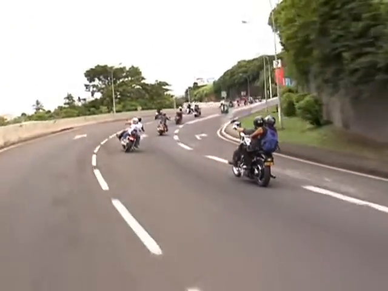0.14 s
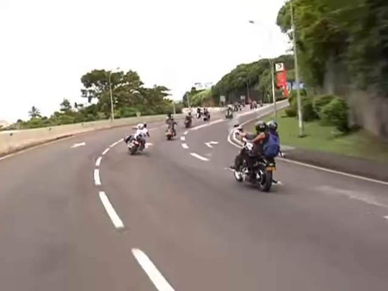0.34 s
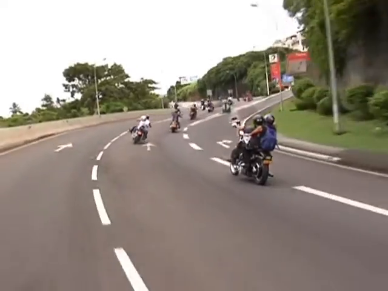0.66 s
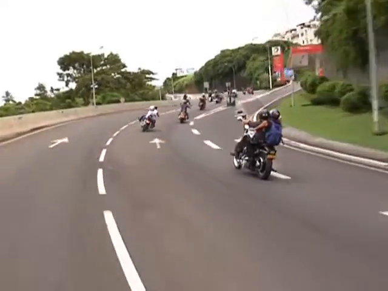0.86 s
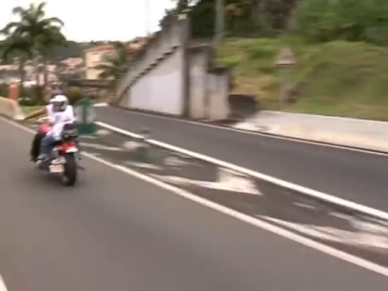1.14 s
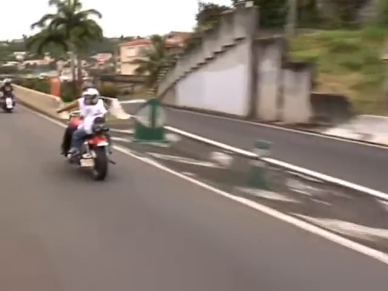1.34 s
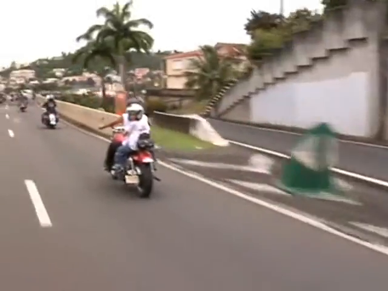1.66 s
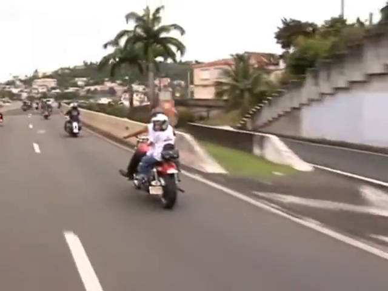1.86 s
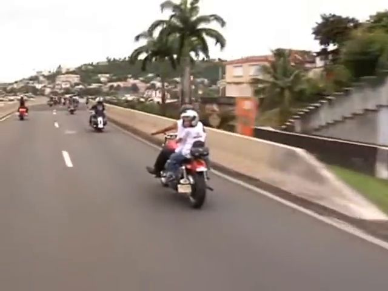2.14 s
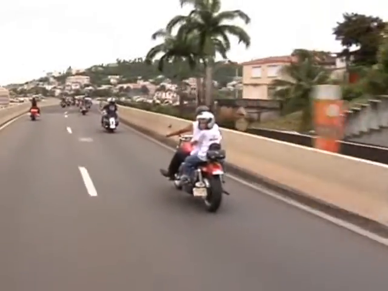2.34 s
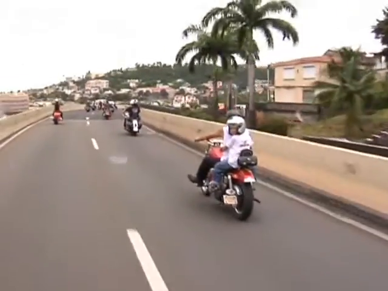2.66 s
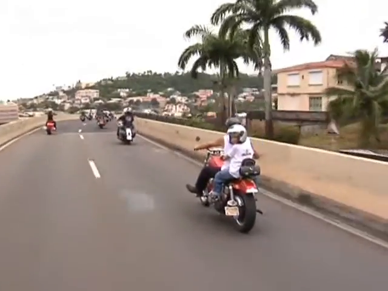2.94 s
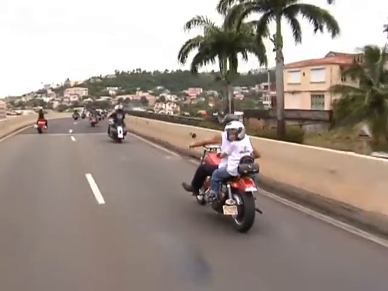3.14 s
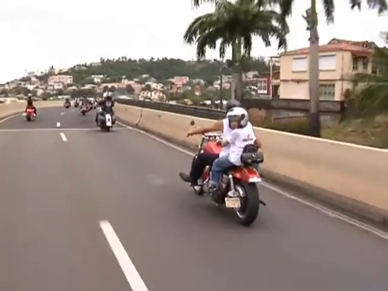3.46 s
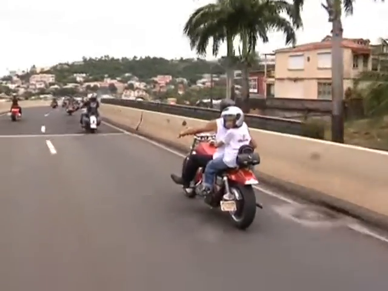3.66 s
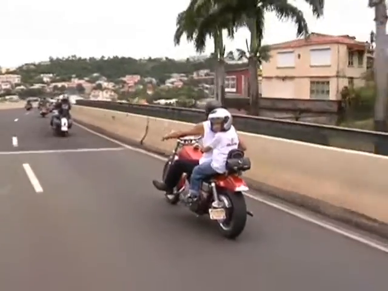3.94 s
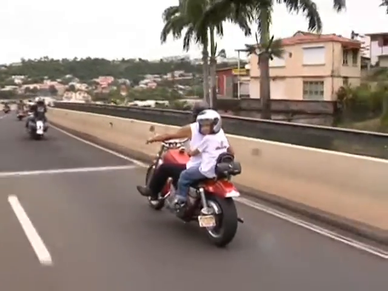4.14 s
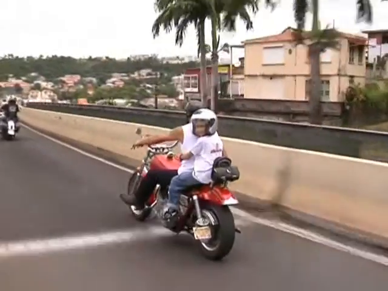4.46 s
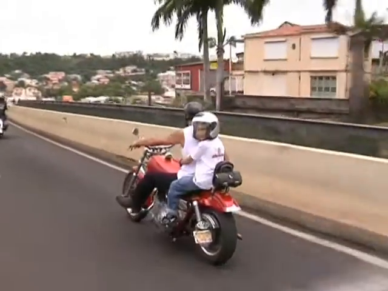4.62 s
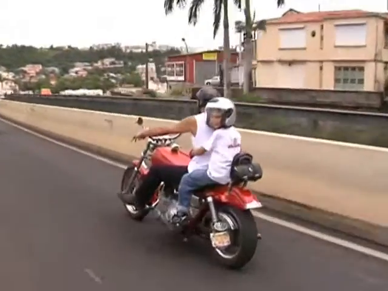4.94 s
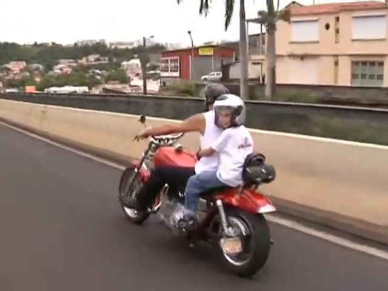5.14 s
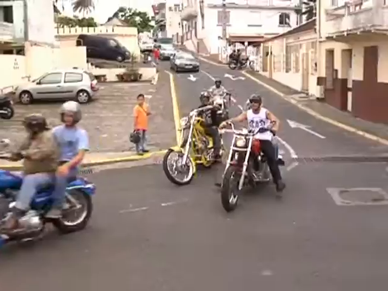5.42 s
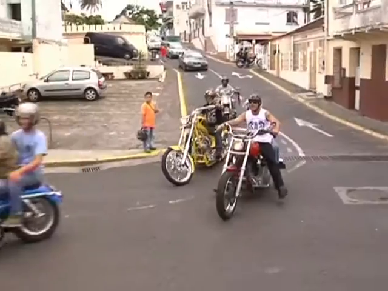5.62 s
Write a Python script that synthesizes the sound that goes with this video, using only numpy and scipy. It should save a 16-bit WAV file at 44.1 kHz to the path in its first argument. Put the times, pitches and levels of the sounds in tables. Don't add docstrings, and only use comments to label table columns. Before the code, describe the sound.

Two motorcycles accelerate away with loud uneven barking exhausts, then a quieter windy ride among droning bikes, ending on a soft slow idle.

```python
import sys
import numpy as np
from scipy import signal
from scipy.fft import rfft, irfft, next_fast_len
from scipy.io import wavfile
from scipy.ndimage import uniform_filter1d, map_coordinates

SR = 44100
rng = np.random.default_rng(int(sys.argv[2]) if len(sys.argv) > 2 else 0)


def transcribe(signal):
    frames = np.atleast_2d(signal).T
    limited = np.clip(frames, -1, 1)
    pcm = np.round(limited * 32767).astype(np.int16)
    wavfile.write(sys.argv[1], SR, pcm)


def to_linear_factor(level_db):
    exponent = np.asarray(level_db, float) / 20
    return 10 ** exponent


N = 255337

SCENE_CHANGES = 1.1625, 5.48
# (time [s], peak [dB])
CLICKS = [(5.4335, -48), (5.48, -41)]

# (time [s], wind [dB], nearness of the pack [dB])
WALL_AIR = [(0, -32.5, -30.5), (.3, -30.5, -30), (.6, -35, -35.5), (.9, -31.5, -34), (1.17, -28.5, -31)]
RIDE_AIR = [(1.17, -37, -39.5), (1.25, -35, -39.5), (1.53, -40, -44), (1.94, -40, -42.5), (2.4, -42, -47),
            (2.8, -41.5, -45.5), (3.3, -40, -46), (3.8, -43, -47.5), (4.1, -41, -44), (4.42, -43, -44.5),
            (4.6, -39.5, -41.5), (4.8, -42, -43.5), (5.42, -39.5, -42.5), (5.48, -39, -45.5)]
STREET_AIR = [(5.48, -42, -50), (5.57, -46, -46.5), (5.8, -40.5, -50)]
# (roar over drone [dB], hiss [dB], share of nearness in the hiss [1])
WALL_MIX = (-7.5, -40.5, 0.41)
RIDE_MIX = (-10.5, -61, 0.37)
STREET_MIX = (-8, -59, .1)

# (frequency [Hz], density [dB per Hz])
WALL_RUMBLE = [(30, -5), (60, 0), (120, 5), (190, -8), (300, -13), (500, -10), (800, -17)]
RIDE_RUMBLE = [(8.8, -56), (15, -7), (43, -2.5), (86, 1.5), (144, -1), (172, -8), (200, -10), (260, -24.5),
               (440, -120)]
STREET_RUMBLE = [(18, -61), (101, 8), (140, -5), (290, -10), (337, 4), (373, -22), (600, -24), (900, -75)]
# (frequency [Hz], density [dB per Hz])
DRONE = [(100, -45), (170, 0.5), (230, 0.5), (300, -5.5), (380, -5.5), (480, -19.5), (700, -20)]
ROAR = [(250, -51), (430, -2), (600, 1), (800, 1), (1130, -3), (1250, -8), (2000, -22.5), (3500, -32)]
TYRE_HISS = [(800, 1.5), (1500, 4.5), (2500, 1.5), (4000, -8), (6000, -12.5), (9000, -21), (12500, -19),
             (15800, -23)]
# (time [s], strength [dB], above -29.5 lifts the level, below lowers it)
THUMPS = [(2.031, -15), (2.19, -23), (3.001, -41), (3.14, -34), (3.291, -25), (3.687, 8), (3.767, -30),
          (4.505, 6)]

# (time [s], peak [dB], knock [dB], length [s])
RATTLES = [(1.1973, -51, 3, 0.0089), (1.283, -54, -11, 0.007), (1.361, -47.5, -27, 0.0082),
           (1.453, -52, -77, 0.007), (1.477, -50, -12, 0.007), (1.597, -50.5, 8, 0.0076),
           (1.93, -59, -15, 0.007), (1.9965, -56, 4, 0.007), (2.0214, -58, 6, 0.007),
           (2.135, -59, 15, 0.007), (2.2674, -58, -3, 0.0058), (2.406, -51.5, 4, 0.0076),
           (2.611, -57, -1, 0.007), (2.716, -54, -21, 0.007), (2.8066, -55, 15, 0.0076),
           (2.953, -52, 2, 0.007), (3.068, -55, 2, 0.007), (3.098, -53, -3, 0.007),
           (3.231, -53, -2, 0.0063), (3.2701, -57, -5, 0.005), (3.4397, -48.5, 2, 0.0076),
           (3.535, -60, -3, 0.007), (3.727, -52, 1, 0.007), (3.866, -54, 4, 0.0076),
           (4.0089, -51, 2, 0.0075), (4.5148, -53, 0, 0.0052), (4.953, -53, 5, 0.007),
           (4.9832, -58, -7, 0.007), (5.135, -56, -6, 0.007), (5.176, -52, 1, 0.007)]
# (frequency [Hz], density [dB per Hz])
CHATTER = [(3000, -18), (5000, 3), (7000, -5.5), (10000, -3), (13000, -2), (14500, -9), (15800, -20)]
KNOCK = [(700, -22), (1500, 3), (3000, 7), (5000, -11), (7000, -18)]

NEAR_CRANK = .02177, 38.43, -.1638, .00335, -1, 32
FAR_CRANK = .45085, 37.22, -.1134, 0, -4, 20
IDLE_CRANK = 5.5006, 68.63, 2.47, 0, 0, 4
LATE_CRANK = 4.5, 50.8, 0, 0, 0, 19
SECOND_FIRING = .393, .398, .455, .49

# (time [s], blow [dB], wall echo [ms], throttle [dB])
NEAR_PLAY = [
    (0, -5, 6.1, .1),
    (.4, -4.5, 6.4, 1.5),
    (.6, -7.5, 6.86, -6.5),
    (.8, -7, 7.14, -5.5),
    (1.2, -5.5, 6.82, -6.5),
]
FAR_PLAY = [
    (.3, -30, 6, -21),
    (.42, -26, 5.2, -7),
    (0.502, -8.5, 4.4, -2),
    (.6, -13, 4.8, -5.5),
    (.75, -17, 4.9, -1.5),
    (.9, -18, 4.6, -3.5),
    (1.03, -23, 5.2, -10.5),
    (1.14, -34, 6, -2.5),
]
IDLE_PLAY = [
    (5.5, -29, 9, -1),
    (5.72, -31, 11, .1),
    (5.8, -40, 13, -3),
]
LATE_PLAY = [
    (4.5, -50, 8, -12),
    (4.77, -42, 8, .1),
    (5.36, -41, 8, 1.5),
    (5.45, -52, 8, -14),
]

# (frequency [Hz], density [dB per Hz])
NEAR_GAS = [(800, 4), (1600, 0), (2600, 2.5), (3300, -4), (4600, -8), (6000, -18), (10000, -24.5),
            (15500, -28.5)]
FAR_GAS = [(500, -39), (1200, 6.5), (2400, 8), (3500, 0.5), (5000, -5), (8000, -18), (12000, -20),
           (15500, -33)]
LATE_GAS = [(400, -25), (700, -8), (950, -3), (1080, 0), (1170, 0), (1230, -14), (1500, -20), (2000, -26)]
# (frequency [Hz], density [dB per Hz])
VALVE_TICK = [(1000, 7.5), (3000, 3), (6000, -4.5), (9000, -11.5), (12000, -6), (14000, -11), (15800, -21)]
# (frequency [Hz], width [Hz], level [dB])
IDLE_PIPE = [(94, 19.4, 11), (175, 29, 2.5), (348, 23, -9), (700, 180, -45)]

# (frequency [Hz], width [Hz], level [dB])
MIC_CAVITY = [(4430, 500, 5), (6110, 500, 7), (7910, 500, 6), (9740, 500, 6), (11400, 700, 6),
              (13200, 900, 4)]
# (frequency [Hz], density [dB per Hz])
SPARE_HISS = [(30, 14), (300, 2), (1000, -6), (2500, -6), (5000, -6), (10000, -1.5), (15500, 3.5)]


def unit(x):
    return x / np.sqrt(np.mean(x ** 2) + 1e-20)


def curves(rows, s):
    at, *columns = np.transpose(rows)
    return [np.interp(s, at, column) for column in columns]


def wobble(rate):
    knots = rng.standard_normal(int(N * rate / SR) + 4)
    return map_coordinates(knots, [np.arange(N) * rate / SR])


def filtered(x, response):
    m = next_fast_len(N + SR // 4)
    return irfft(rfft(x, m) * response(np.fft.rfftfreq(m, 1 / SR)), m)[..., :N]


def rush(spectrum, patchy_db):
    z = signal.stft(rng.standard_normal(N), nperseg=512)[2]
    patches = uniform_filter1d(rng.standard_normal(z.shape), size=5, axis=0)
    patches = uniform_filter1d(patches, size=8, axis=1)
    noise = signal.istft(z * to_linear_factor(patchy_db * unit(patches)), nperseg=512)[1][:N]
    f, db = np.transpose([(1, -120), *spectrum, (SR / 2, -120)])
    return unit(filtered(noise, lambda hz: to_linear_factor(np.interp(np.log(hz + 1), np.log(f + 1), db))))


def train(times, sizes, shape, lead=0):
    at = np.round(times * SR).astype(int)
    ok = (at >= 0) & (at < N)
    return signal.fftconvolve(np.bincount(at[ok], sizes[ok], N), shape)[lead:lead + N]


def traffic(rows, mix, low, high, lumpy_db, gusty_db, lift_db=0):
    wind_db, pack_db = curves(rows, np.arange(N) / SR)
    roar_db, hiss_db, follows = mix
    throbs = np.diff(wobble(30), prepend=0)
    lumps = lumpy_db * np.clip(unit(throbs), -2.5, 2.5)
    rumble = unit(to_linear_factor(.4 * lumps + gusty_db * wobble(14)) * rush(low, patchy_db=.3))
    drone = unit(to_linear_factor(lumps + gusty_db * wobble(16)) * rush(DRONE, patchy_db=1.1))
    roar = unit(to_linear_factor(.6 * lumps + 1.6 * wobble(70)) * rush(ROAR, patchy_db=1.2))
    hiss = unit(to_linear_factor(lumps + .24 * wobble(12)) * rush(high, patchy_db=.9))
    hiss_db = hiss_db + follows * (pack_db - np.mean(rows, axis=0)[2])
    bed = to_linear_factor(wind_db + 1.5 * lift_db) * rumble
    bed = bed + to_linear_factor(pack_db + lift_db) * drone
    bed = bed + to_linear_factor(pack_db + roar_db + .38 * lift_db) * roar
    return bed + to_linear_factor(hiss_db + .075 * lift_db) * hiss


def thumps():
    s, db = np.transpose(THUMPS)
    t = np.arange(SR // 8) / SR
    swell = (1 - np.exp(-t / .018)) * np.exp(-t / .025)
    return train(s, .34 * (db + 29.5), swell)


def firings():
    rate, over_pack_db, spread_db = 130, -2, 2.2
    chance = rng.random((int(rate * N / SR), 2))
    s = chance[:, 0] * N / SR
    db = curves(RIDE_AIR, s)[1] + over_pack_db - spread_db * np.log(chance[:, 1] + .03)
    return bark(500, 300, .0014, .002, .2, 130, -6)(s, to_linear_factor(db))


def rattles():
    lead_s, shakes_a_s, shake_db = .003, 70, -79
    rough_s, rough_wide_s, rough_db = 2.79, .08, 14
    t = np.arange(SR // 10) / SR
    gates = np.zeros((2, N))
    for s, db, knock_db, length in RATTLES:
        burst = (1 - np.exp(-t / .003)) * np.exp(-t / length)
        levels = to_linear_factor(np.array([[db - 7], [db - 8 + .8 * knock_db]]))
        gates[:, round((s - lead_s) * SR):][:, :len(t)] += levels * burst
    chance = rng.random((int(shakes_a_s * N / SR), 2))
    s = chance[:, 0] * N / SR
    db = shake_db - 1.6 * np.log(chance[:, 1] + .015)
    db = db + rough_db * np.exp(-((s - rough_s) / rough_wide_s) ** 2)
    shakes = train(s, to_linear_factor(db), (1 - np.exp(-t / .0024)) * np.exp(-t / .007))
    gates = gates + shakes * to_linear_factor(np.array([[-2], [4]]))
    flutter = to_linear_factor(2.2 * wobble(350))
    return flutter * (gates[0] * rush(CHATTER, patchy_db=1.5) + gates[1] * rush(KNOCK, patchy_db=1.5))


def clicks():
    s, db = np.transpose(CLICKS)
    return train(s, to_linear_factor(db + 10), np.exp(-np.arange(300) / 40))


def thud(times, sizes):
    def pipe(hz):
        return sum(to_linear_factor(db + 38.5) * 1j * hz * w / (c * c - hz * hz + 1j * hz * w) for c, w, db in IDLE_PIPE)

    return filtered(train(times + .002, sizes, np.hanning(60) / 30), pipe)


def bark(rise_hz, fall_hz, rise_s, fall_s, snap, boom_hz, boom_db, ring_db=-40):
    t = np.arange(-200, 900) / SR
    swing = np.cos(2 * np.pi * np.where(t < 0, rise_hz, fall_hz) * t)
    shape = -swing * np.where(t < 0, np.exp(-(t / rise_s) ** 2), np.exp(-t / fall_s))
    shape = (1 - snap) * shape - snap * np.exp(-(t / .00045) ** 2)
    boom = np.sin(2 * np.pi * boom_hz * t) * (t > 0) * np.exp(-t / .0032)
    ring = np.cos(2 * np.pi * 880 * t) * np.exp(-np.abs(t) / np.where(t < 0, .001, .0017))
    shape = shape + to_linear_factor(boom_db) * boom - to_linear_factor(ring_db) * ring
    shape = uniform_filter1d(shape - shape.mean(), size=9)
    shape = shape * signal.windows.tukey(len(t), .2)
    return lambda times, sizes: train(times, sizes, shape, 200)


def twin(crank, play, second, pulse, gas, second_db, second_rasp_db, rasp_db, echo_db, echo_rasp_db,
         rasp_s, late_ms, scatter_db, patchy_db):
    start, cycle_ms, change_ms, ease_ms, *span = crank
    whole = np.arange(*span)
    turn = np.sort(np.r_[whole, whole + second])
    fire = start + (cycle_ms * turn + change_ms * turn ** 2 / 2 + ease_ms * turn ** 3 / 6) / 1000
    chance = rng.standard_normal((len(fire), 7))
    blow_db, echo_ms, throttle_db = curves(play, fire)
    is_second = turn % 1 > 0
    rasp_db = rasp_db + throttle_db + second_rasp_db * is_second
    blow_db = blow_db + second_db * is_second
    fire = fire + .00007 * chance[:, 0]
    times = np.r_[fire, fire + echo_ms / 1000, fire + 1.75 * echo_ms / 1000]
    blows = np.r_[blow_db + scatter_db * chance[:, 1],
                  blow_db + echo_db + 2.2 * chance[:, 2],
                  blow_db + echo_db - 7 + 2.2 * chance[:, 3]]
    rasps = np.r_[rasp_db, rasp_db + echo_rasp_db, rasp_db + echo_rasp_db - 6]
    rasps = rasps + 2.2 * chance[:, 4:].T.ravel()
    t = np.arange(-200, 1200) / SR
    puff = np.exp(np.where(t < 0, t / (.35 * rasp_s), -t / rasp_s))
    puff = puff + .046 * np.exp(-np.abs(t) / .0059)
    gate = np.abs(train(times + late_ms / 1000, to_linear_factor(rasps), puff, 200))
    return pulse(times, to_linear_factor(blows)) + gate * rush(gas, patchy_db)


def scene():
    t = np.arange(N) / SR
    first = np.clip((SCENE_CHANGES[0] - t) / .002, 0, 1)
    last = np.clip((t - SCENE_CHANGES[1]) / .002, 0, 1)
    near_second, far_second, idle_second, late_second = SECOND_FIRING

    near_bark = bark(467, 315, .0012, .0018, .46, 170, -10, ring_db=-14.5)
    near = twin(NEAR_CRANK, NEAR_PLAY, near_second, near_bark, NEAR_GAS,
                second_db=1.5, second_rasp_db=-.2, rasp_db=-27, echo_db=-13.5, echo_rasp_db=2.5,
                rasp_s=.0013, late_ms=.51, scatter_db=.25, patchy_db=2)
    far_bark = bark(890, 291, .0012, .0032, .2, 200, -21)
    far = twin(FAR_CRANK, FAR_PLAY, far_second, far_bark, FAR_GAS,
               second_db=-1.1, second_rasp_db=.5, rasp_db=-17.5, echo_db=-24, echo_rasp_db=-48,
               rasp_s=.0017, late_ms=.0048, scatter_db=3.5, patchy_db=1.5)
    idle = twin(IDLE_CRANK, IDLE_PLAY, idle_second, thud, VALVE_TICK,
                second_db=-3, second_rasp_db=-5, rasp_db=-53, echo_db=-6, echo_rasp_db=-12,
                rasp_s=.005, late_ms=1.5, scatter_db=1.5, patchy_db=1.4)
    late_bark = bark(480, 340, .0021, .0013, .41, 170, -22)
    late = twin(LATE_CRANK, LATE_PLAY, late_second, late_bark, LATE_GAS,
                second_db=6.5, second_rasp_db=-1, rasp_db=-57, echo_db=-12, echo_rasp_db=-1.5,
                rasp_s=.0093, late_ms=.22, scatter_db=4.5, patchy_db=3)

    wall_air = traffic(WALL_AIR, WALL_MIX, WALL_RUMBLE, TYRE_HISS, lumpy_db=2.2, gusty_db=.3)
    ride_air = traffic(RIDE_AIR, RIDE_MIX, RIDE_RUMBLE, TYRE_HISS, lumpy_db=-.3, gusty_db=1.5, lift_db=thumps())
    street_air = traffic(STREET_AIR, STREET_MIX, STREET_RUMBLE, VALVE_TICK, lumpy_db=.8, gusty_db=.3)

    wall = first * (near + far + wall_air)
    ride = (1 - first) * (1 - last) * to_linear_factor(7.5) * (ride_air + firings() + late + rattles())
    street = last * (idle + street_air)
    return np.array([np.zeros(N), wall + ride + street + clicks()])


def band_limit(x):
    return signal.sosfilt(signal.butter(12, 15960, fs=SR, output="sos"), x)


def record(dry):
    def cavity(hz):
        return to_linear_factor(sum(db / (1 + (2 * (hz - c) / w) ** 2) for c, w, db in MIC_CAVITY))

    right = filtered(dry[1], cavity)
    right = right / (1 + np.abs(right / .56) ** 6) ** (1 / 6)
    left = to_linear_factor(-70) * right + to_linear_factor(-82.5) * rush(SPARE_HISS, patchy_db=.4)
    return band_limit(np.array([left, right]))


dry = scene()
out = record(dry)
transcribe(out)
```